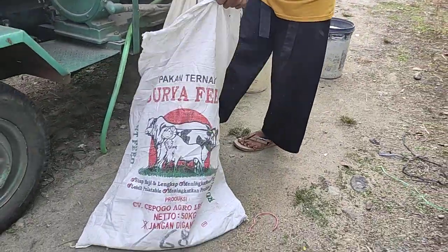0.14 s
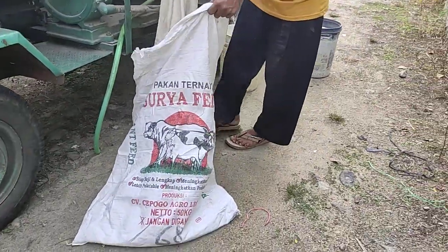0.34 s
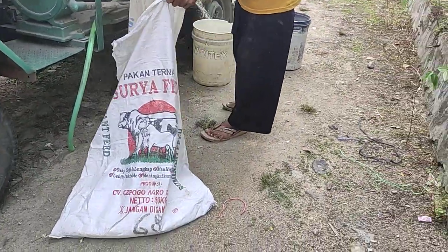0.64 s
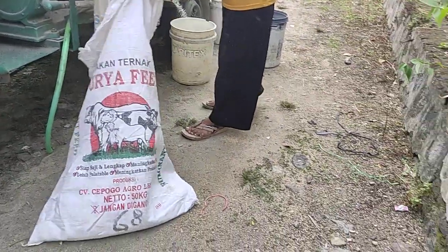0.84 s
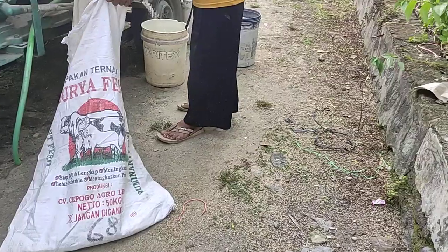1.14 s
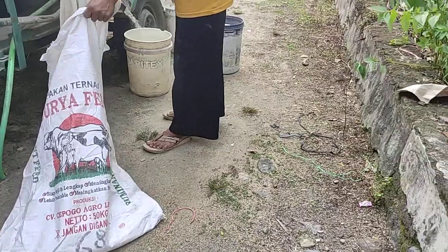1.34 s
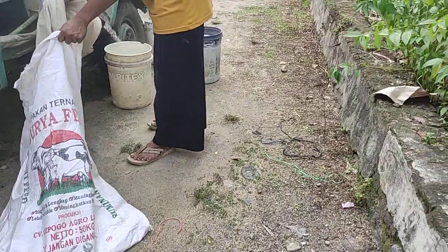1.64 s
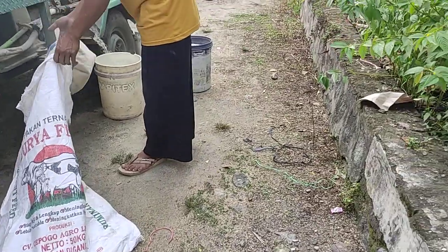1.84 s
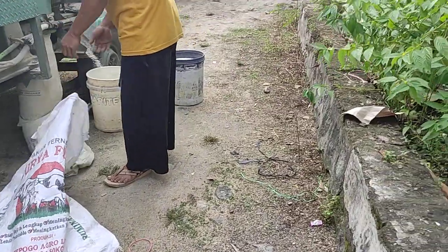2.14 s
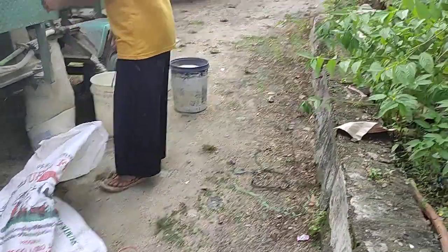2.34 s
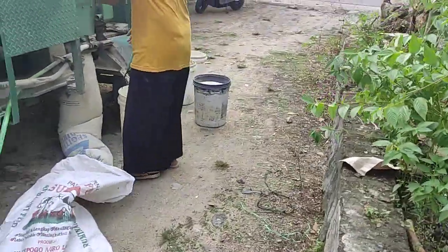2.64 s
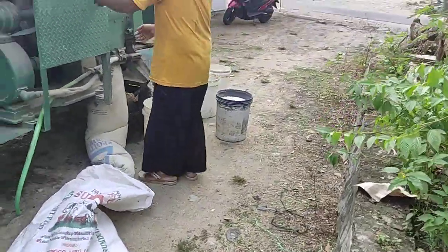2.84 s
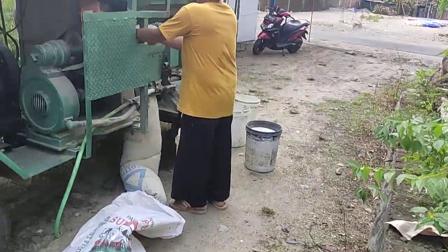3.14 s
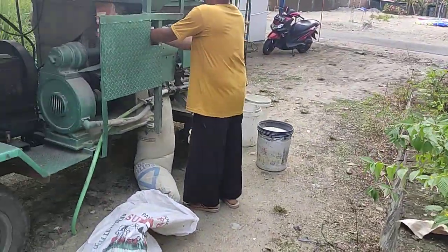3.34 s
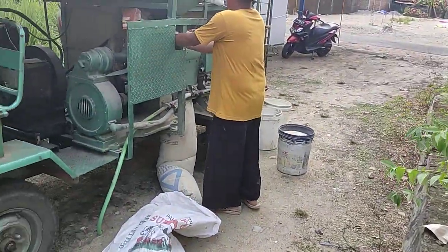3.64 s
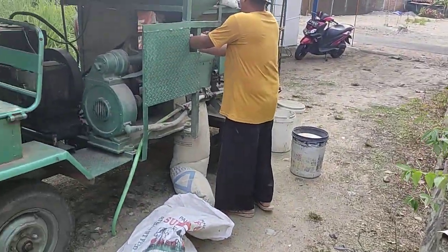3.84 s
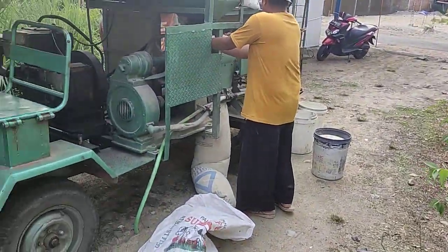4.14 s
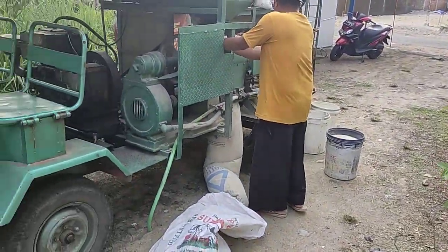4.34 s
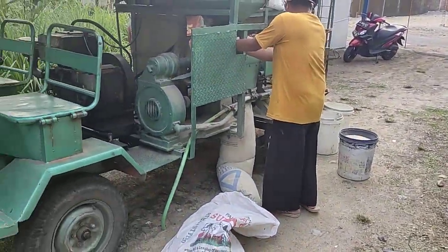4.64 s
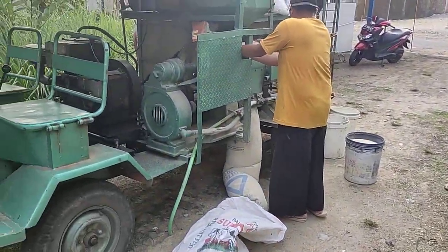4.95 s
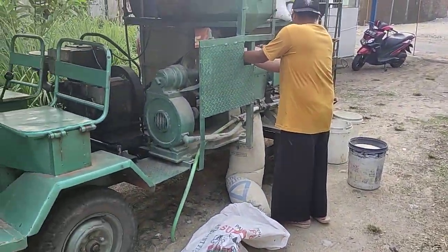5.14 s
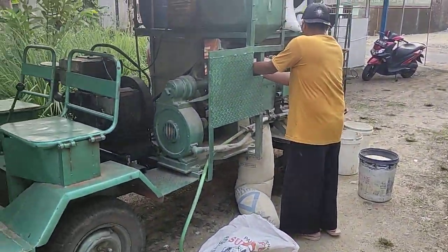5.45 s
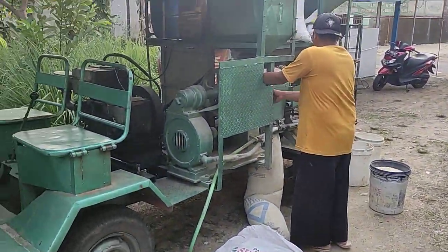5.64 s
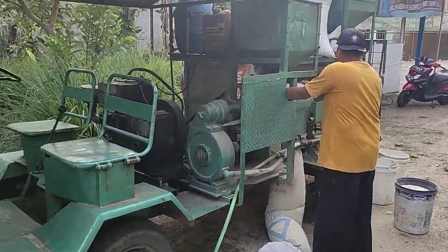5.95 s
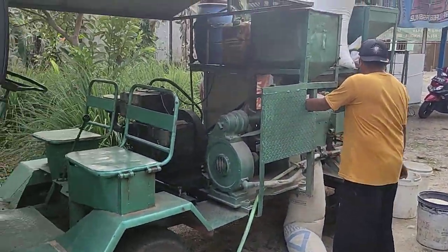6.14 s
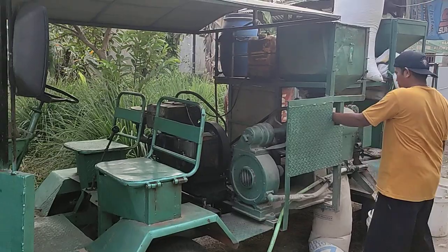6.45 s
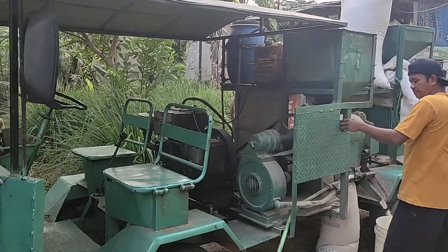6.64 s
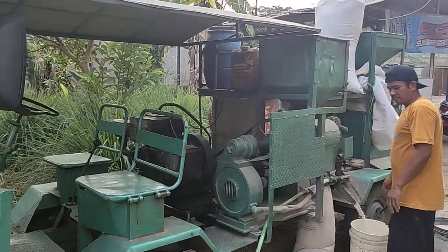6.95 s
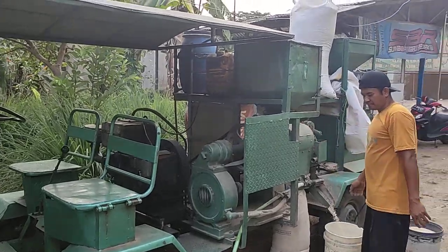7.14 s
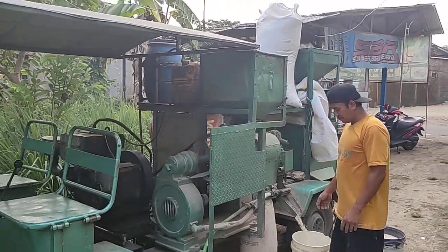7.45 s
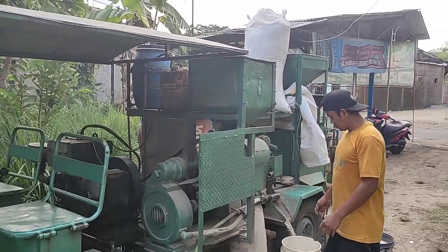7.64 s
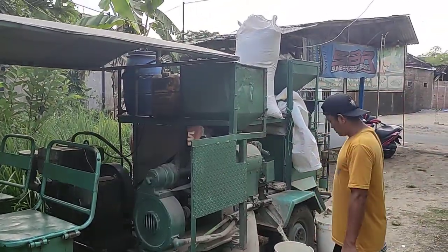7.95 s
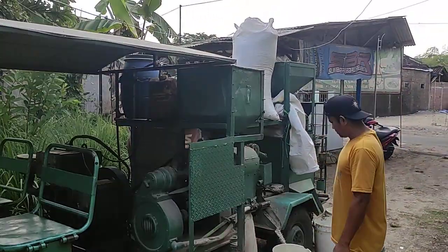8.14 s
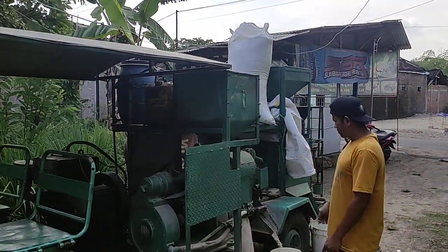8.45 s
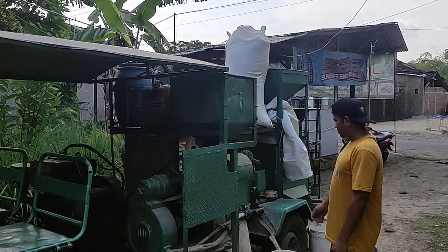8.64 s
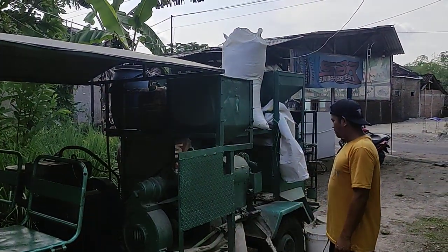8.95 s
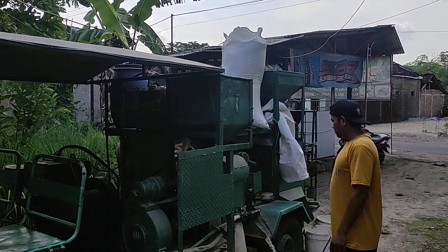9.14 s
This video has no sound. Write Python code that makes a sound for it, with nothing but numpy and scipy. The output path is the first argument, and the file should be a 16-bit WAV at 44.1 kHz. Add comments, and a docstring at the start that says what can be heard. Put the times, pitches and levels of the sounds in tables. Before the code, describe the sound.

A single-cylinder diesel engine knocks rapidly and steadily while a mobile rice mill clatters, rattles and hisses with rushing grain in an open yard.

```python
"""A single-cylinder four-stroke diesel knocks, puffs and gulps air about nine times a second.
It drives a mobile rice mill in an open yard, heard in stereo from a few steps away by someone walking round it.
Noise-like contacts ring the frame, casings and panels; grain rushes through huller and polisher in uneven spurts.
Clicks timed by the engine cycle ring the block, pipes and guard; a loose steel part buzzes now and then."""
import sys
import numpy as np
from scipy import signal
from scipy.fft import rfft, irfft
from scipy.io import wavfile
from scipy.ndimage import uniform_filter1d

SR = 44100
rng = np.random.default_rng(int(sys.argv[2]) if len(sys.argv) > 2 else 0)


def log_audio(samples):
    """Write samples as a 16-bit WAV file to the path given in sys.argv[1]."""
    # one column per channel
    frames = np.atleast_2d(samples).T
    # limit to full scale, then quantise
    limited = np.clip(frames, -1, 1)
    pcm = np.round(limited * 32767).astype(np.int16)
    wavfile.write(sys.argv[1], SR, pcm)


N = 409248
TIME = np.arange(N) / SR
FREQS = np.maximum(np.fft.rfftfreq(N, 1 / SR), 1)
FIRING_PLACE = .887   # where in the engine cycle (0-1) the fuel ignites


def from_db(db):
    """Decibels to gain."""
    return 10 ** (np.asarray(db) / 20)


def rms_one(x):
    """Scale to unit power."""
    return x / np.sqrt(np.mean(x ** 2) + 1e-20)


def in_time(rows):
    """Each column of a curve at every sample."""
    s, *columns = np.transpose(rows)
    return [np.interp(TIME, s, column) for column in columns]


def in_pitch(points):
    """A spectrum table at every frequency, joined along a logarithmic pitch scale."""
    hz, value = np.transpose(points)
    return np.interp(np.log(FREQS), np.log(hz), value)


def band(x, low_hz, high_hz):
    """Causal band-pass."""
    edges_hz = [low_hz, min(high_hz, .45 * SR)]
    return signal.sosfilt(signal.butter(2, edges_hz, "band", fs=SR, output="sos"), x + 1e-18)


def noise_band(low_hz, high_hz):
    """Stereo band of noise, rms 1."""
    return rms_one(band(rng.standard_normal((2, N)), low_hz, high_hz))


def drift(rate_hz):
    """Slow random wander with spread 1."""
    return rms_one(irfft(rfft(rng.standard_normal(N)) / (1 + (FREQS / rate_hz) ** 2), N))


def ring(clicks, hz, t60_s):
    """A unit click sets a decaying sine of starting height 1 ringing."""
    radius = from_db(-60 / (t60_s * SR))
    angle = 2 * np.pi * hz / SR
    return signal.lfilter([0, np.sin(angle)], [1, -2 * radius * np.cos(angle), radius ** 2], clicks + 1e-18)


def die_away(clicks, t60_s):
    """Envelope that jumps at each click and decays."""
    return signal.lfilter([1], [1, -from_db(-60 / (t60_s * SR))], clicks + 1e-18)


def later(x, ms):
    """The same sound, delayed."""
    return np.interp(TIME - ms / 1000, TIME, x)


def spell(from_s, to_s, fade_s):
    """1 between two times and 0 outside, with a ramp centred on each end."""
    return np.clip(.5 + np.minimum(TIME - from_s, to_s - TIME) / fade_s, 0, 1)


def each_cycle(turns, place, spread_db, jitter_ms):
    """One click per engine cycle at the given place, never quite alike."""
    at_s = np.interp(np.arange(int(turns[-1]) + 1) + place, turns, TIME, right=-1)
    at_s = at_s[at_s > 0]
    chance = rng.standard_normal((len(at_s), 2))
    index = ((at_s + chance[:, 0] * jitter_ms / 1000) * SR).astype(int)
    clicks = np.zeros(N)
    clicks[np.clip(index, 0, N - 1)] = from_db(spread_db * chance[:, 1])
    return clicks


def swells(events, t60_s, rise_s):
    """Envelope of separate events, each rising over rise_s and dying away."""
    hits = np.zeros(N)
    for s, db in events:
        hits[round(s * SR)] = from_db(db)
    return uniform_filter1d(die_away(hits, t60_s), size=max(int(rise_s * SR), 1))


def rattle(spectrum, per_s, spread_db):
    """Countless small contacts of uneven size ringing a body; stereo, rms 1."""
    # likeness of the two microphone ports: pitch_hz, likeness (0-1)
    port_likeness = [(30, .7), (100, .97), (350, .96), (550, .85), (800, .96), (1300, .8), (2500, .3),
                     (4500, .1), (9000, 0)]
    sizes = rng.standard_normal((3, N)) * from_db(spread_db * np.clip(rng.standard_normal((3, N)), -2, 2))
    contacts = rfft(sizes * (rng.random((3, N)) < per_s / SR))
    alike = np.clip(in_pitch(port_likeness), 0, 1)
    # one shared stream of contacts and one for each port
    pair = np.sqrt(alike) * contacts[0] + np.sqrt(1 - alike) * contacts[1:]
    lowest_hz, highest_hz = spectrum[0][0], spectrum[-1][0]
    skirts = 1 + (FREQS / highest_hz) ** 4 + (lowest_hz / FREQS) ** 4
    return rms_one(irfft(pair * from_db(in_pitch(spectrum)) / skirts, N))


def knock(turns, crack_low_hz=800, crack_high_hz=1400, bright_db=-10):
    """Combustion and piston slap ring the iron block, each with a short rough crack."""
    # combustion, piston slap and an echo off the bodywork, before trims: after_firing_ms, ring_db, crack_db
    blow_rows = [(0, -7.5, -22), (3.45, -14, -23), (10.3, -22, -24.5), (15.35, -15.7, -21),
                 (18.8, -23, -28)]
    # ring of the block, before trims: pitch_hz, level_db, t60_s
    block_modes = [(780, -13, .035), (848, -4.8, .04), (914, -5.5, .042), (1060, -12.5, .028),
                   (1170, -14.5, .026), (1380, -16, .022), (1712, -22, .06), (3950, -22, .015),
                   (5510, -29, .15)]
    # firings that knock harder than the rest: time_s
    hard_firings = [3.192, 4.261, 5.234, 5.671, 6.328, 6.981, 8.605, 8.713, 9.248]
    hard_db, ring_trim_db, crack_trim_db, crack_t60_s = 2.5, 1.4, -1.5, .044
    firings = each_cycle(turns, FIRING_PLACE, spread_db=.5, jitter_ms=.25)
    for s in hard_firings:
        firings = firings * from_db(hard_db * (np.abs(TIME - s) < .03))
    blows, cracks = 0, 0
    for ms, ring_db, crack_db in blow_rows:
        clicks = later(firings, ms)
        blows = blows + from_db(ring_db) * clicks
        cracks = cracks + from_db(crack_db) * die_away(clicks, crack_t60_s)
    rings = sum(from_db(db + .6 * drift(18)) * ring(blows, hz, t60_s) for hz, db, t60_s in block_modes)
    rings = band(band(rings, 650, 9000), 650, 9000)   # twice, for steeper edges
    body = noise_band(crack_low_hz, crack_high_hz)
    edge = from_db(bright_db) * noise_band(1160, 3000)
    return from_db(ring_trim_db) * rings + from_db(crack_trim_db) * cracks * (body + edge)


def exhaust(turns, thud_db=-34):
    """A muffled double puff follows each power stroke and sets the silencer booming."""
    # two puffs, the second of opposite sign: place in the cycle (0-1), pitch_hz, t60_s, level_db
    puff_rows = [(0.083, 278, 0.079, -14.5), (0.137, 205, 0.047, -15)]
    puffs = [each_cycle(turns, place, spread_db=.5, jitter_ms=.15) for place, *_ in puff_rows]
    pipe = 0
    for k, (_, hz, t60_s, db) in enumerate(puff_rows):
        pipe = pipe + (-1) ** k * from_db(db) * ring(puffs[k], hz, t60_s)
    boom = from_db(thud_db) * (ring(puffs[0], 131.0, 0.26) - ring(puffs[0], 84, 0.14))
    return band(pipe + boom, 92, 1260)


def intake(turns, low_hz=195, high_hz=430, muffle_hz=480):
    """The opening inlet valve sends a hollow gulp up and down the air pipe, turned over at each return."""
    # trips along the pipe, before the trim: delay_ms, level_db
    pipe_trips = [(0, -8.8), (6.75, -6.3), (13.5, -19)]
    trim_db, uneven_db = 1.5, .3
    gulp = band(each_cycle(turns, .3645, spread_db=.3, jitter_ms=.15), low_hz, high_hz)
    gulp = gulp / np.abs(band(signal.unit_impulse(N // 100), low_hz, high_hz)).max()
    gulp = from_db(trim_db) * signal.sosfilt(signal.butter(6, muffle_hz, fs=SR, output="sos"), gulp)
    out = 0
    for k, (ms, db) in enumerate(pipe_trips):
        out = out + (-1) ** k * from_db(db + uneven_db * drift(8.4)) * later(gulp, ms)
    return out


def compression(turns):
    """The frame gives soft low thuds as the piston compresses the air."""
    # place in the cycle (0-1), pitch_hz, t60_s, level_db
    thud_rows = [(.55, 121, 0.11, -28.5), (0.679, 230, 0.03, -37)]
    thuds = 0
    for place, hz, t60_s, db in thud_rows:
        clicks = each_cycle(turns, place, spread_db=4.0, jitter_ms=0.2)
        thuds = thuds + from_db(db) * ring(clicks, hz, t60_s)
    return band(thuds, 65, 630)


def valves(turns):
    """Bright ticks of noise as the valves land on their seats."""
    # landings, before the trim: place in the cycle (0-1), level_db
    landings = [(.015, -29), (.135, -22), (.365, -31), (.668, -35)]
    ticks = sum(from_db(db) * each_cycle(turns, place, spread_db=-3.5, jitter_ms=0.56)
                for place, db in landings)
    envelope = from_db(-7) * die_away(ticks, .035)
    return envelope * noise_band(5100, 10000)


def guard(turns):
    """Each firing sets the sheet-steel guard ringing."""
    # ring of the guard panels, before the band-pass: pitch_hz, level_db, t60_s
    guard_modes = [(1600, -24, .06), (1715, -21, .09)]
    firings = each_cycle(turns, FIRING_PLACE, spread_db=.5, jitter_ms=.25)
    return band(sum(from_db(db) * ring(firings, hz, t60_s) for hz, db, t60_s in guard_modes), 1660, 2200)


def cycle_swing(turns):
    """Swing of the rattle in dB: several quick rises in each engine cycle, each dying away."""
    # rises of the rattle through the engine cycle: place (0-1), swing_db
    rise_rows = [(.775, 2.5), (.87, 4.5), (0.93, 1.5), (0.07, 6), (.34, 4.5), (0.68, 4.5)]
    attack_s, decay_s = 0.0062, 0.029
    cycle_s, swing_db = TIME[-1] / turns[-1], 0
    for place, db in rise_rows:
        age_s = (turns - place) % 1 * cycle_s
        swing_db = swing_db + db * np.minimum(age_s / attack_s, np.exp((attack_s - age_s) / decay_s))
    return swing_db - swing_db.mean()


def spurts(per_s=70, t60_s=0.078):
    """Uneven feed: sudden rises that fall back slowly; spread 1."""
    swing = die_away(rng.random(N) * (rng.random(N) < per_s / SR), t60_s)
    return rms_one(swing - swing.mean())


def frame(close, back, facing):
    """Dense, even contacts make the frame rumble steadily."""
    # pitch_hz, relative density_db (per Hz)
    frame_spectrum = [(20, -38), (45, -23), (68, -13.5), (84, -7.5), (112, -3), (175, -2), (235, 2),
                      (355, 3.5), (430, -11.5), (520, -12), (620, -9), (800, -39), (1500, -75)]
    level_db = -21.1 + 0.9 * close - 0.1 * back - 1.2 * facing
    return from_db(level_db) * rattle(frame_spectrum, per_s=8000, spread_db=.5)


def casing(swing_db, close, back, facing):
    """The casings clatter, following only a share of the swing through the engine cycle."""
    # pitch_hz, relative density_db (per Hz)
    casing_spectrum = [(480, -43), (640, -16), (740, -2.5), (840, -4.5), (1000, -4.5), (1130, -2.5),
                       (1280, -5), (1400, -4), (1550, -18), (2200, -26.5)]
    level_db = -19.6 - 8 * close - 0.1 * back - 1.0 * facing
    return from_db(level_db + .42 * swing_db) * rattle(casing_spectrum, per_s=6000, spread_db=1.5)


def panels(swing_db, close, back, facing):
    """Sparse, very uneven contacts rattle the panels, strongest when the listener faces them."""
    # pitch_hz, relative density_db (per Hz)
    panel_spectrum = [(590, -6), (680, 4), (760, -3), (900, 1), (1080, 4), (1270, -36), (1480, -7.5),
                      (1610, 3.5), (1660, 1), (1720, 5.5), (1810, -5.5), (1950, -13.5), (2200, -36),
                      (2450, -11), (2800, -18), (3450, -26), (3900, -8), (4400, -11)]
    level_db = -25.5 + 0.39 * close - 0.58 * back + 8.1 * facing
    level_db = level_db + 0.8 * swing_db + .5 * drift(25)
    return from_db(level_db) * rattle(panel_spectrum, per_s=4000, spread_db=6.0)


def huller(swing_db, close, back, facing):
    """Grain tumbles through the huller, swinging with the engine cycle and fed in spurts."""
    # pitch_hz, relative density_db (per Hz)
    huller_spectrum = [(250, -2), (430, 8), (560, -7), (730, -8), (980, -4), (1300, -7), (1620, -1.5),
                       (1850, 0.5), (2100, -1.5), (2500, -2.5), (2780, -4), (3100, -11.5), (4000, -57)]
    level_db = -21.6 + 1.1 * close + 1.8 * back - 2.2 * facing
    level_db = level_db + 0.58 * swing_db + 0.35 * spurts()
    return from_db(level_db) * rattle(huller_spectrum, per_s=13000, spread_db=2.0)


def outlet(swing_db, close):
    """The hollow of the grain outlet rings under uneven contacts, heard only from close by."""
    # pitch_hz, relative density_db (per Hz)
    outlet_spectrum = [(350, -13), (460, -18), (580, -12), (748, -3.5), (880, -9), (1020, -13), (1180, -3),
                       (1400, -1), (1850, -13), (2250, -3.5), (2520, -8.5), (2750, -1.5), (3000, -29)]
    level_db = -18.0 + 0.82 * swing_db + 0.5 * spurts()
    return close * from_db(level_db) * rattle(outlet_spectrum, per_s=6000, spread_db=7.5)


def polisher(feed_db, close, back, facing):
    """Bright rush of grain through the polisher, following the feed with spurts of its own."""
    # pitch_hz, relative density_db (per Hz)
    polisher_spectrum = [(2500, 12), (3300, 6), (3900, 4.5), (4800, 0.5), (5600, -5), (6700, -12),
                         (7300, -36), (10000, -40)]
    level_db = -24.2 + 0.57 * close + 4.0 * back + 0.28 * facing
    level_db = level_db + feed_db + .5 * spurts()
    return from_db(level_db) * rattle(polisher_spectrum, per_s=18000, spread_db=4.1)


def grain(feed_db):
    """The finest, densest contacts are the grain's hiss, following the feed."""
    # pitch_hz, relative density_db (per Hz)
    grain_spectrum = [(5000, -12), (6500, -5.5), (7200, -12.5), (8000, -9), (8800, -3.5), (9600, -8.5),
                      (11000, -20.5), (11900, -14.5), (14000, -19.5), (16000, -61)]
    # slow course of the hiss: time_s, relative level_db
    hiss_course = [(0, 0), (1.0, 0.5), (1.7, 1.5), (2.4, 1.7), (3.0, -0.5), (3.5, 1), (3.88, 2.5),
                   (4.1, -1), (4.6, 1), (5.6, 0.5), (6.6, -0.9), (7.15, 1.5), (7.7, 0.5), (8.6, -0.5),
                   (8.85, 1), (9.28, -1)]
    level_db = -30.4 + in_time(hiss_course)[0]
    level_db = level_db + 1.13 * feed_db + .8 * spurts()
    return from_db(level_db) * rattle(grain_spectrum, per_s=24000, spread_db=0.5)


def passing_bands(swing_db):
    """Narrow noise bands swell and fade, swinging in level with the engine cycle."""
    # from_s, to_s, pitch_hz, level_db
    band_rows = [(0, 0.802, 1477, -28.5), (1.0, 1.55, 2500, -28), (1.85, 2.7, 2340, -36),
                 (2.453, 3.1, 1590, -26), (2.696, 3.15, 1210, -21), (5.8, 7.1, 1385, -28),
                 (3.75, 4.655, 1204, -22), (6.837, 7.918, 3900, -37), (7.55, 8.05, 1670, -27),
                 (7.6, 8.3, 775, -35)]
    half_width_hz, fade_s = 157 / 2, 0.5
    out = 0
    for from_s, to_s, hz, db in band_rows:
        noise = noise_band(hz - half_width_hz, hz + half_width_hz)
        out = out + from_db(db) * spell(from_s, to_s, fade_s) * noise
    return from_db(0.72 * swing_db) * out


def lifts_and_drops():
    """Gain for brief rises and falls in the rattle's level."""
    # time_s, change_db (positive lifts, negative drops)
    change_rows = [(.075, 2), (.6, 1.5), (2.42, -1.5), (2.54, -3), (3.6, -1), (6.72, -2.5), (7.27, -1.5),
                   (8.58, -4)]
    width_s = .018
    return from_db(sum(db * np.exp(-((TIME - s) / width_s) ** 2) for s, db in change_rows))


def mill(turns, close, back, facing):
    """Casings and grain swing with the engine cycle over a steady frame; levels follow the listener's moves."""
    swing_db = cycle_swing(turns)
    feed_db = 0.55 * swing_db + .45 * spurts()   # shared by polisher and hiss
    metal = casing(swing_db, close, back, facing) + panels(swing_db, close, back, facing)
    stages = huller(swing_db, close, back, facing) + outlet(swing_db, close)
    stages = stages + polisher(feed_db, close, back, facing) + grain(feed_db)
    return frame(close, back, facing) + lifts_and_drops() * (metal + stages + passing_bands(swing_db))


def surges(t60_s=0.19, rise_s=0.008, per_s=7000, low_hz=1850, high_hz=3000):
    """Handfuls of grain crackle coarsely as husks split between the huller rolls."""
    # time_s, level_db before the rise is smoothed
    surge_rows = [(.42, -18), (.862, -16), (1.172, -21), (1.26, -21), (1.583, -18), (1.8, -19),
                  (2.272, -20), (2.327, -23), (2.46, -25), (2.675, -18), (2.78, -18), (3.83, -15.5),
                  (4.05, -19), (4.49, -19), (4.797, -20), (6.43, -20), (7.094, -17), (7.3, -21)]
    cracks = rng.standard_normal((2, N)) * (rng.random((2, N)) < per_s / SR)
    return swells(surge_rows, t60_s, rise_s) * rms_one(band(cracks, low_hz, high_hz))


def flicks(t60_s=0.066, rise_s=0.026, low_hz=5500, high_hz=11000):
    """Small sprays of grain flick against the steel chute, swelling briefly out of the hiss."""
    # time_s, level_db before the rise is smoothed
    flick_rows = [(.212, -23), (.425, -24), (.533, -16), (.625, -32), (1.285, -23), (1.812, -19),
                  (1.932, -19), (2.04, -32), (2.467, -18), (2.677, -31), (3.108, -20), (3.535, -24),
                  (3.857, -22), (3.932, -24), (5.04, -26), (5.257, -23), (5.917, -19), (6.135, -20),
                  (7.003, -30), (7.118, -24), (7.222, -23), (7.988, -19), (8.305, -19), (8.73, -23)]
    spray = band(band(rng.standard_normal((2, N)), low_hz, high_hz), low_hz, high_hz)
    return swells(flick_rows, t60_s, rise_s) * rms_one(spray)


def chatter(per_s=900, width=0.093, fade_s=0.0081):
    """A loose steel part buzzes: runs of quick touches, each run ringing around its own pitch."""
    # start_s, length_s (fade_s is added), level_db before the envelope, pitch_hz
    chatter_rows = [(1.593, 0.032, -24, 3100), (2.325, .025, -23, 3700), (3.607, 0.035, -28, 6200),
                    (4.486, .04, -24, 5060), (4.92, 0.064, -23, 3700), (6.328, 0.021, -24, 3860),
                    (6.446, 0.028, -32, 5600), (7.09, 0.064, -27, 5030), (7.3, 0.025, -22, 3600),
                    (7.408, 0.022, -16.5, 3900), (7.63, .04, -23, 3850), (8.498, 0.032, -27, 6200),
                    (8.604, 0.019, -18.5, 3930), (8.778, .06, -26, 5360), (9.032, .04, -26, 5200)]
    out = np.zeros((2, N))
    for s, length_s, db, hz in chatter_rows:
        total_s = length_s + fade_s
        age_s = np.arange(int(total_s * SR)) / SR
        touches = rng.standard_normal((2, len(age_s))) * (rng.random(len(age_s)) < per_s / SR)
        envelope = np.minimum(2 * age_s / fade_s, 1) * np.sqrt(1 - age_s / total_s)
        buzz = from_db(db) * envelope * rms_one(band(touches, hz * (1 - width), hz * (1 + width)))
        start = round(s * SR)
        out[:, start:start + len(age_s)] += buzz[:, :N - start]
    return out


def shaft(turns, slip_turns=0.03, waver_db=3.5):
    """The belt-driven mill shaft hums low, out of step with the engine; its belt slips a little."""
    # multiple of the shaft's speed, level_db about which it wavers
    shaft_hum = [(2, -48), (3, -41), (4, -41.5), (5, -39.5)]
    ratio = 3.083   # shaft turns per engine cycle
    angle = 2 * np.pi * (ratio * turns + slip_turns * drift(0.56))
    return sum(from_db(db + waver_db * drift(2.2)) * np.sin(round(k) * angle) for k, db in shaft_hum)


def yard(x):
    """A few reflections from the ground, the roof and the walls."""
    # delay_ms, level_db
    yard_echoes = [(18.5, -35), (25.8, -17.5), (34.5, -10), (61, -49)]
    return x + sum(from_db(db) * later(x, ms) for ms, db in yard_echoes)


def scene():
    """The engine's cycle times the rattle, the mill shaft runs by belt; all stand a little to the left."""
    # governed engine speed, sagging a little under the load of grain: time_s, firings per s
    engine_speed = [(0.0, 9.449), (0.53, 9.401), (1.4, 9.414), (1.94, 9.299), (2.55, 9.288), (4.0, 9.399),
                    (4.89, 9.212), (5.89, 9.115), (6.68, 9.202), (8.0, 9.21), (8.38, 9.3), (9.28, 9.337)]
    # level of the knock, which the body of the mill hides for a while: time_s, relative level_db
    knock_course = [(0, -.3), (.45, .7), (.75, -.5), (1.15, -12), (2.0, -12), (2.2, -5), (2.45, -4),
                    (2.65, -15), (3.08, -.3), (3.6, -.7), (4.3, .3), (5.7, .8), (7.0, .5), (8.05, 1.2),
                    (9.28, 0)]
    # the listener's moves: from_s, to_s, fade_s
    close_move = (0.98, 2.85, 0.53)   # close by the grain outlet
    back_move = (3.6, 14, 6.2)   # backing away along the machine
    facing_move = (7.34, 14, 0.83)   # facing the guard panels
    turns = np.cumsum(in_time(engine_speed)[0]) / SR   # engine cycles so far
    close, back, facing = spell(*close_move), spell(*back_move), spell(*facing_move)
    knock_db, = in_time(knock_course)
    engine = from_db(knock_db) * knock(turns) + yard(intake(turns) + exhaust(turns))
    engine = engine + compression(turns) + valves(turns) + facing * guard(turns)
    machine = mill(turns, close, back, facing) + shaft(turns)
    left, right = engine + machine + chatter() + surges() + flicks()
    lead_ms = 0.22 + 0.09 * close - 0.09 * back + 0.06 * facing   # the left ear leads
    return np.array([left, later(right, lead_ms)])


def record(dry):
    """The left microphone port is brighter in the top treble; peaks are rounded, deep bass and top are cut."""
    # microphone ports: pitch_hz, left_minus_right_db
    port_balance = [(100, 2.5), (350, 2), (800, 0.5), (1150, 2.5), (1400, -5), (1750, -2), (2100, -7),
                    (3300, -5), (4800, -0.5), (6300, 8), (8800, 25.5), (10500, 11), (13000, 20)]
    cutoff_hz = 14700
    ports = from_db(in_pitch(port_balance) * np.array([[.5], [-.5]]))
    ports = ports / np.sqrt(np.mean(ports ** 2, axis=0))   # keeps the mean power of the pair
    coloured = irfft(rfft(dry) * ports, N)
    coloured = signal.sosfilt(signal.butter(1, 25, "high", fs=SR, output="sos"), coloured)
    rounded = 1.15 * np.tanh(coloured / 1.15)
    return signal.sosfilt(signal.ellip(10, .2, 80, cutoff_hz, fs=SR, output="sos"), rounded)


dry = scene()
out = record(dry)
log_audio(out)
```